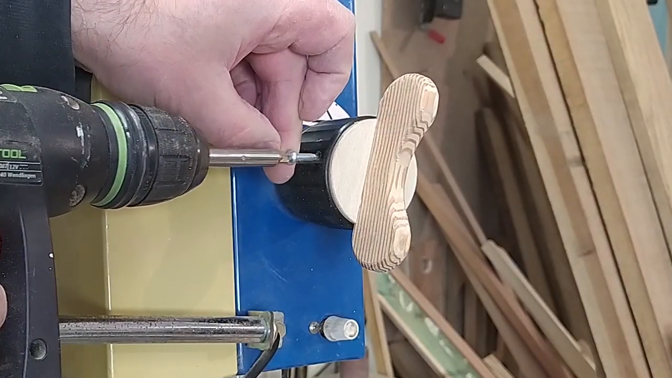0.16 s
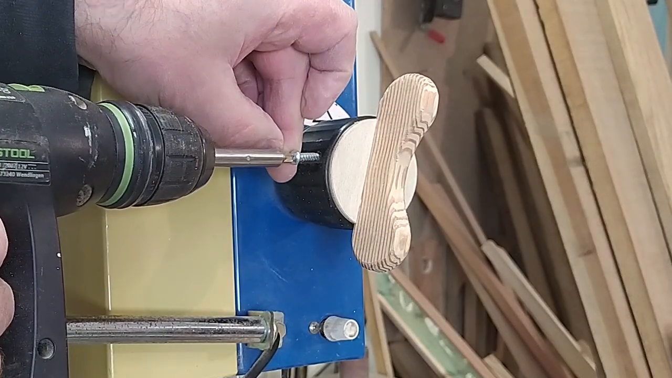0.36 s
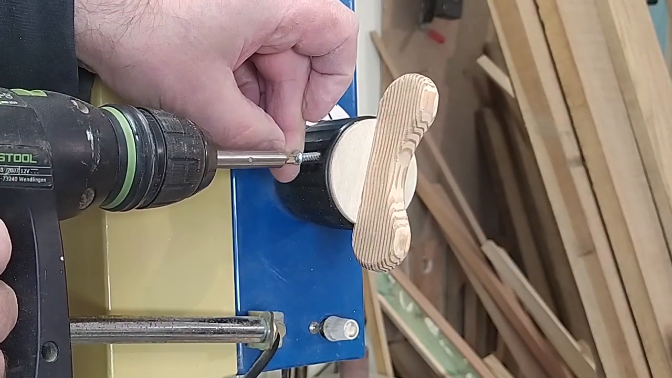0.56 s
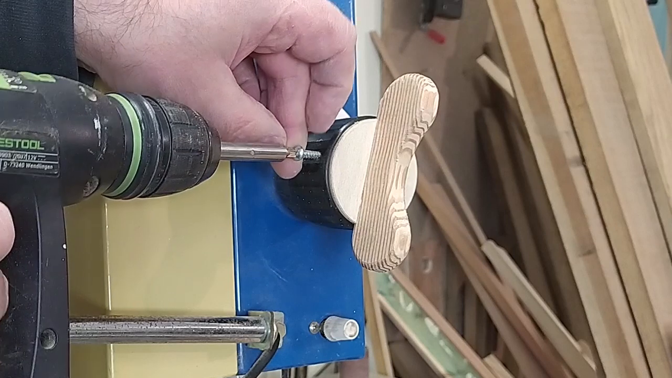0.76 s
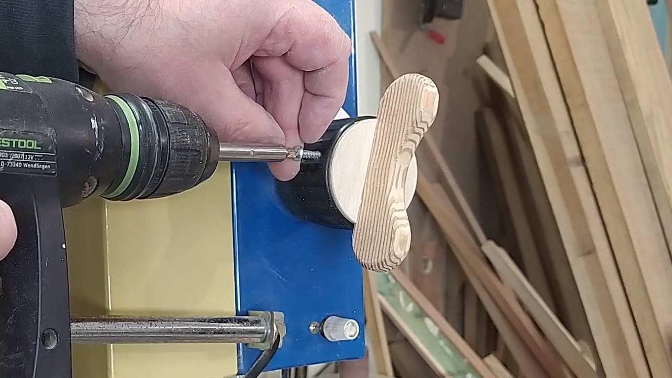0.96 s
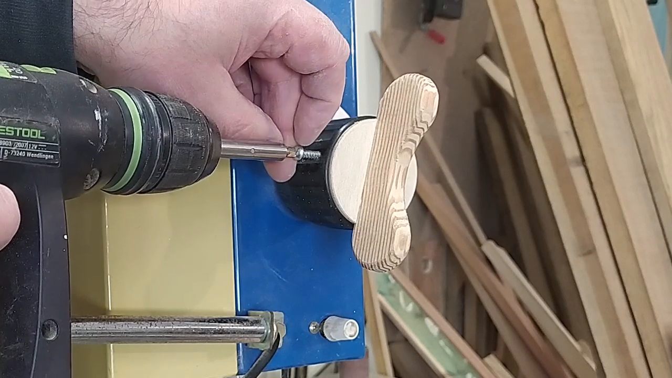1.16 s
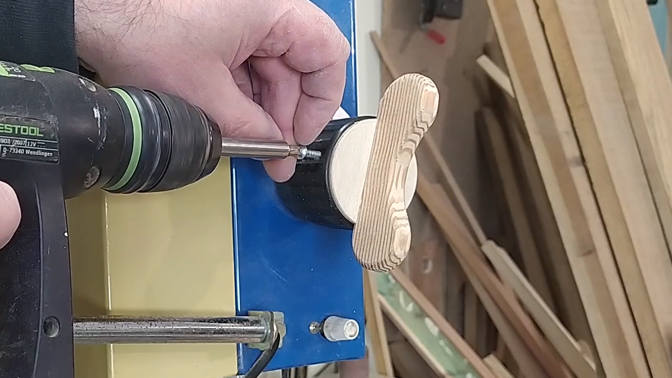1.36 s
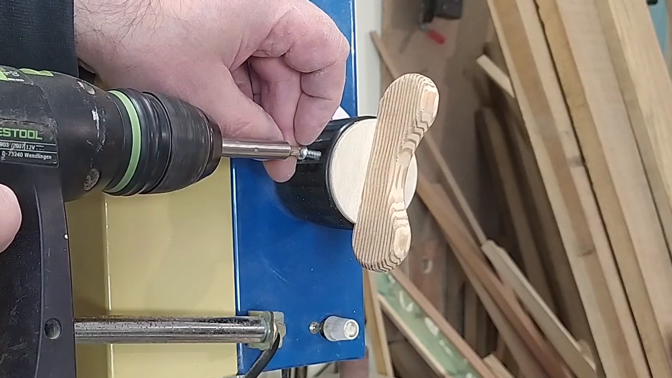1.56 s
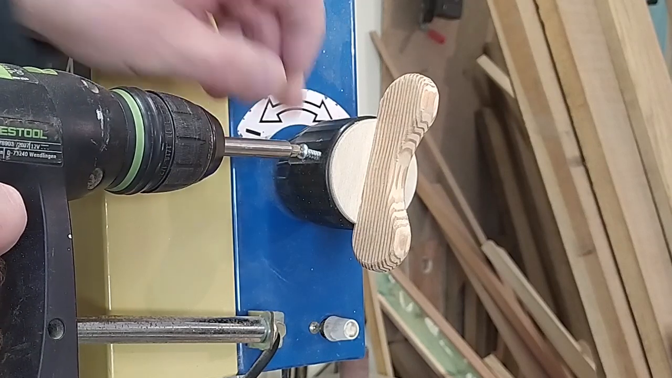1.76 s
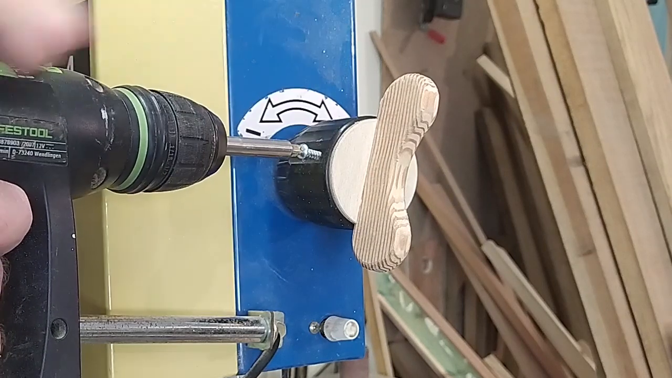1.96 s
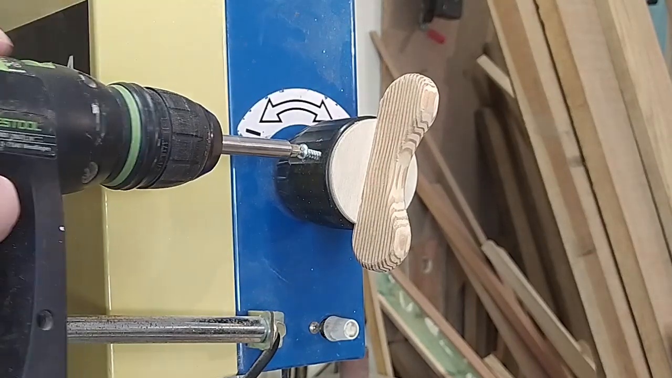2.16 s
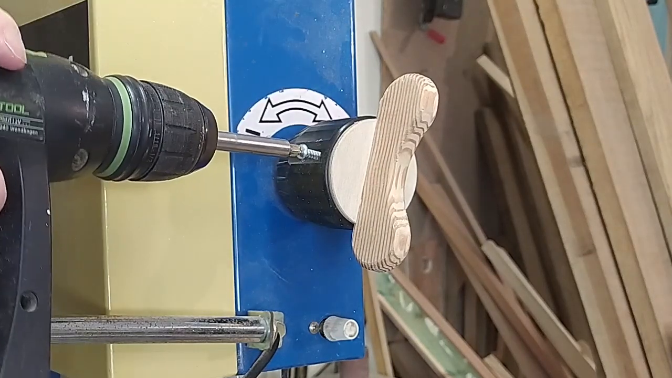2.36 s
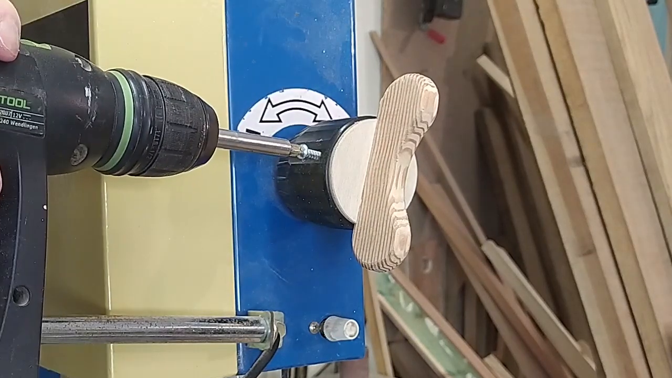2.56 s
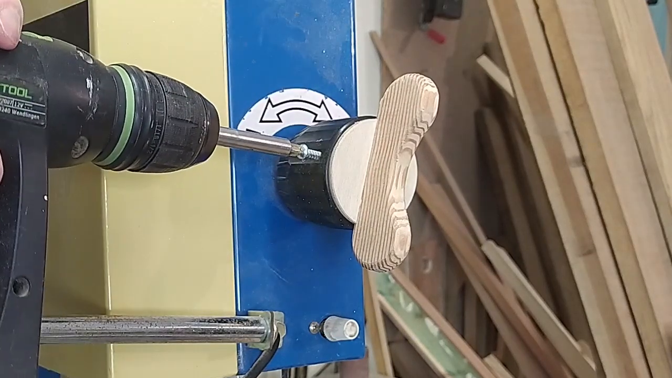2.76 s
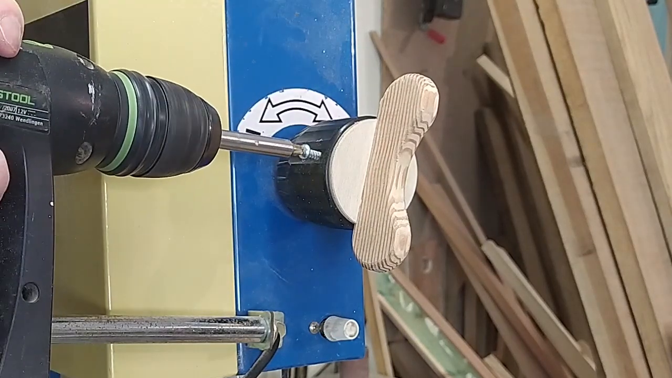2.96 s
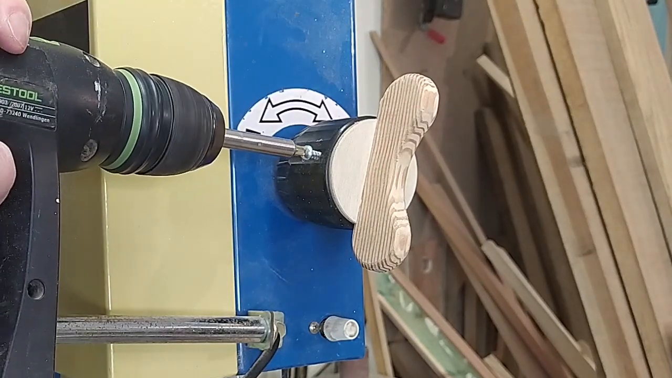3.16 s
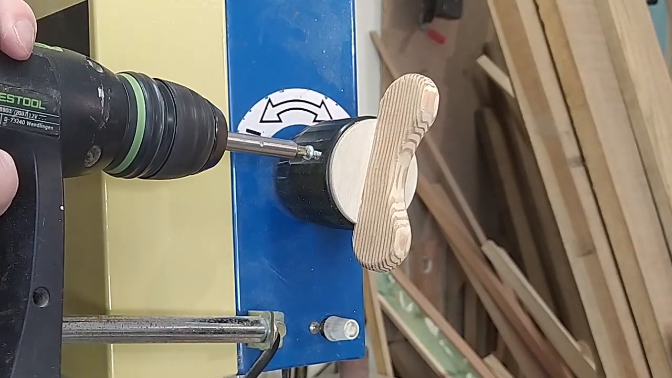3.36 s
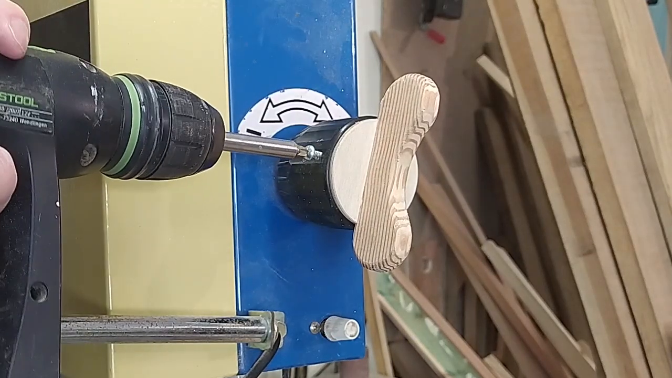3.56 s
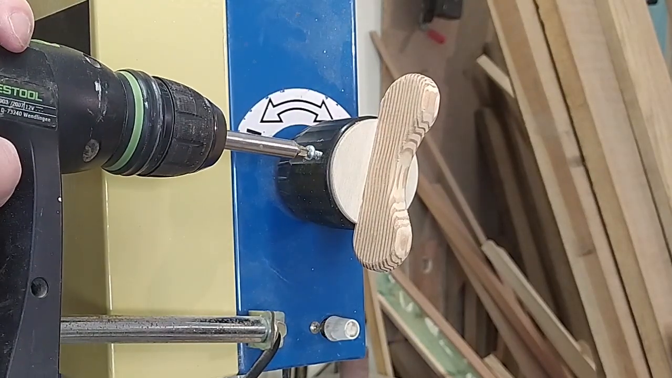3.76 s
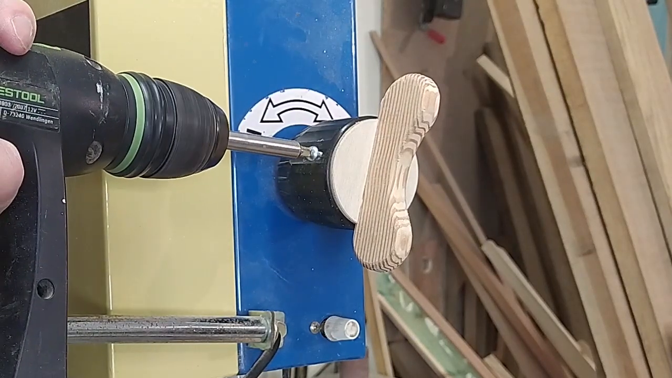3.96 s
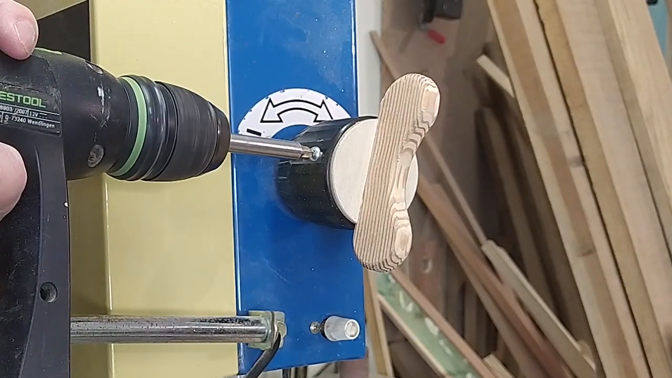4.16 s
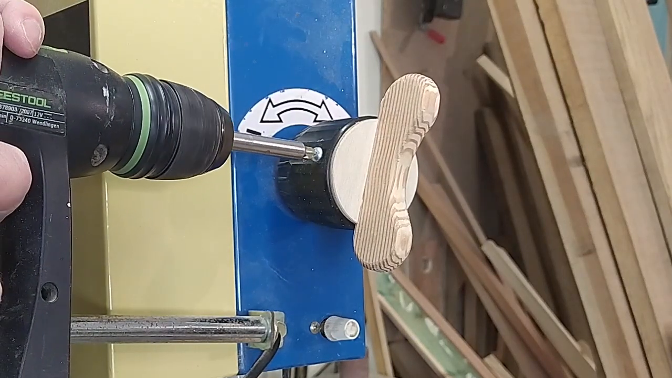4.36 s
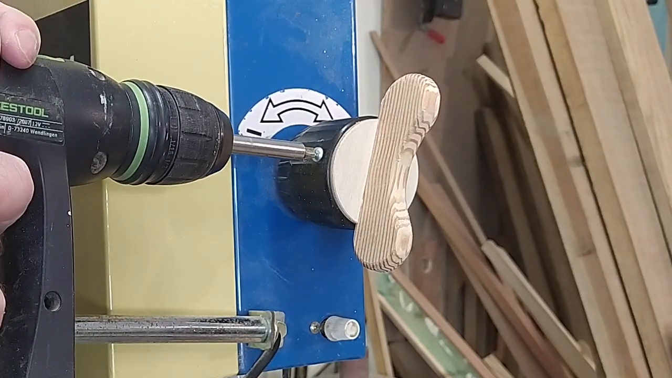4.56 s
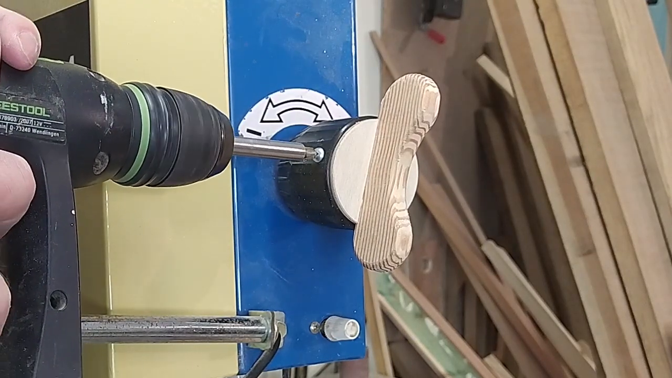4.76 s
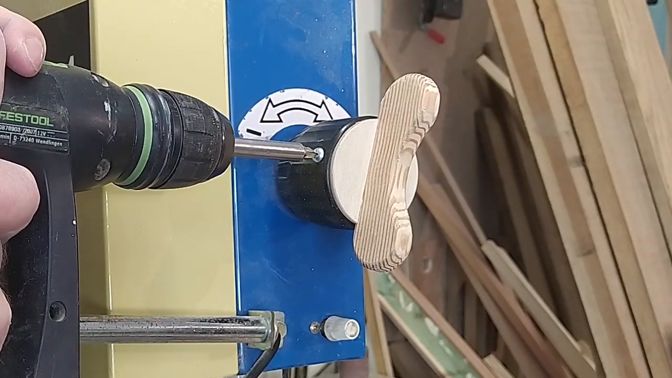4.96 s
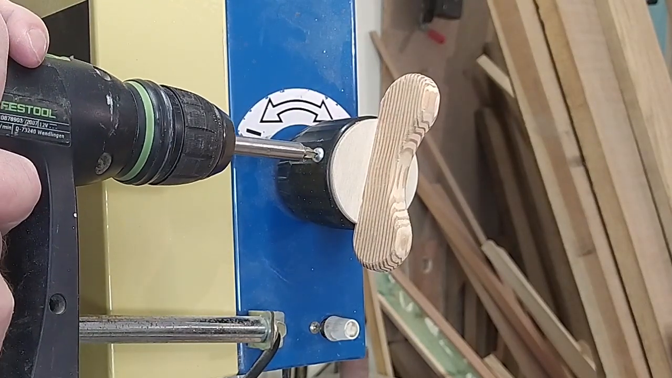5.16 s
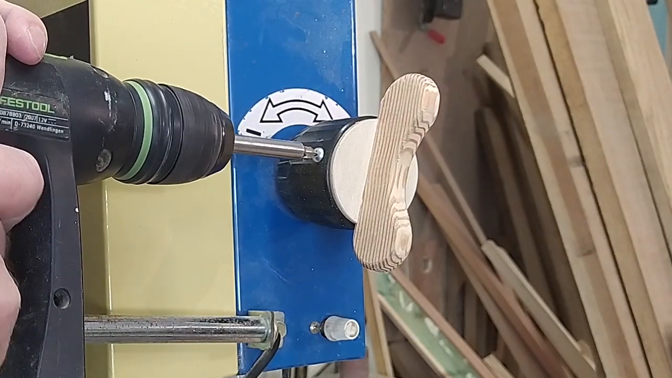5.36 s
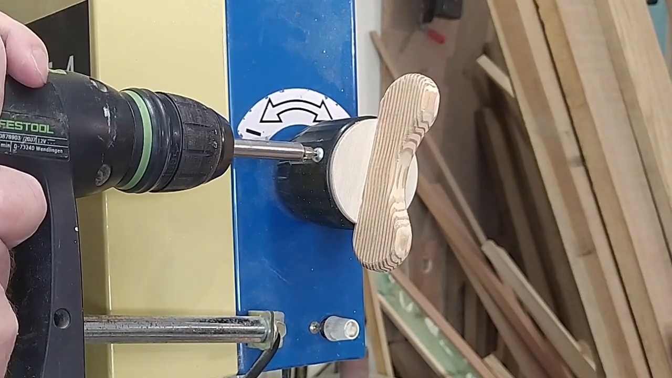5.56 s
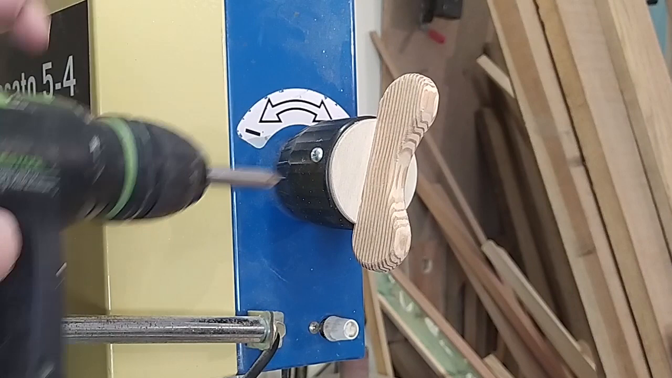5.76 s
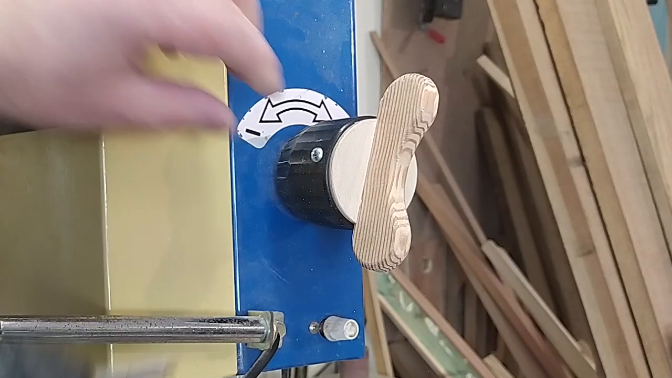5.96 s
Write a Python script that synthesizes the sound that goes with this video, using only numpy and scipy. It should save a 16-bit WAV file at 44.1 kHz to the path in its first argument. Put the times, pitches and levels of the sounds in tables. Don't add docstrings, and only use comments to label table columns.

```python
import sys
import numpy as np
from scipy import signal
from scipy.fft import rfft, irfft, next_fast_len
from scipy.io import wavfile
from scipy.ndimage import uniform_filter1d

SR = 44100
rng = np.random.default_rng(int(sys.argv[2]) if len(sys.argv) > 2 else 0)


def invert_db(level):
    return 10 ** (np.asarray(level, dtype=float) / 20)


def persist_wave(psi):
    counts = np.round(np.clip(psi, -1, 1) * 32767).astype(np.int16)
    wavfile.write(sys.argv[1], SR, np.atleast_2d(counts).T)


N = 265834
T = np.arange(N) / SR
SIZE = next_fast_len(N + SR)

# [f/Hz, level/dB per Hz]
SHOP_AIR = [(12, -37), (20, -3), (60, -6), (81, -18.5), (189, -19.5), (263, -26), (302, -23.5), (1190, -32),
            (1650, -32), (3970, -44), (10600, -42), (14000, -74)]
SHOP_DB = -65.5

# [t/s of peak, level/dB, rise/s per 20 dB,
# fall/s per 20 dB, deep sway/dB re level]
LEANS = [(0.072, -63.5, -2.5, 0.1, 0), (0.285, -57.5, 0.05, 0.7, -9), (0.39, -53, 0.04, 0.11, 6.5),
         (0.64, -59, -0.1, 0.36, -2), (1.77, -66, 0.3, 0.45, 13), (1.9, -63, 0.6, 0.34, 16.5),
         (2.308, -72.5, -0.2, 0.2, -1), (2.63, -79, 0.3, .13, 9.5), (3.06, -67.5, .09, -6, 12),
         (3.475, -53, 0.7, .03, 4), (4.3, -52.5, .5, .5, 8.5), (5.08, -55, 3, 0.5, 10.5)]
# [t/s, push level/dB, clatter/dB re push]
JOLTS = [(0.278, -62, -1.5), (0.356, -43, 2), (0.636, -61, -15), (3.544, -20, 3), (3.589, -37, 6),
         (3.614, -30.5, -1), (4.566, -17, 4), (4.585, -34.5, 10), (4.606, -29, -6), (4.639, -27.5, -6),
         (5.07, -37.5, -15), (5.511, -16, 2), (5.529, -35, 2.5), (5.572, -31, 11), (5.6, -35, 6)]
# [f/Hz, level/dB, t60/s]
PANELS = [(62, -14, 0.3), (83.2, -9.5, 0.44), (103.7, -15.5, 0.89), (113.9, -17, 1.6), (161.97, -12, 2.5),
          (182, -11.5, 1.78), (198, -2, 0.21), (268.4, -1.5, 0.5), (295, -16.5, 2.6), (289.5, -7.5, 0.91),
          (363.3, -6.5, 0.92), (388, -4.5, 0.48), (414.8, -6.5, 0.56), (483.6, -13.5, 0.85),
          (559.4, -13, 0.86), (688, -16, .3), (717, -1, 0.26), (777, -6, 0.14), (1100, -30, .3),
          (1550, -16, .12), (1670, -26, .12)]
# [f/Hz, level/dB per Hz]
CLATTER = [(60, -53), (120, -21), (180, -2), (270, 3), (450, -12), (890, -15.5), (1450, -18.5),
           (2430, -23.5), (6300, -38), (8500, -29), (10500, -33.5), (15600, -66)]
CLATTER_T60_S, CLATTER_S_PER_DB = 0.25, 0.06

# [t/s, peak
# level/dB]
SCREW_TICKS = (-14, -10, 2, -25), [(0.1521, -64), (0.187, -63), (0.2853, -62), (1.4087, -49), (2.2039, -60),
               (2.2692, -57), (2.3094, -58)]
CHUCK_TICKS = (2.5, -8, 1.05, -31), [(0.3506, -59.5), (1.3164, -51), (1.3778, -56.5), (2.6094, -58.5),
               (2.9934, -56.5), (5.343, -46.5), (5.9189, -49)]
SQUEEZE_TICKS = (-13.5, -6.5, 0.76, -22.5), [(1.2595, -51), (2.8993, -33.5), (3.014, -39), (3.8901, -51),
                 (4.8302, -27.5)]
TRIGGER_TICKS = (-14.5, -6.5, 0.97, -48), [(1.317, -40), (3.9434, -32), (3.9644, -45), (4.8466, -41),
                 (5.2644, -40.5), (5.3323, -36.5), (5.447, -32), (5.4725, -31)]
BIT_TICKS = (-5.5, -11, 0.75, -14), [(1.4795, -28), (3.5498, -19.5), (3.644, -27), (4.5694, -18.5),
             (5.0894, -32), (5.5018, -23.5), (5.5144, -22)]
# [f/Hz, level/dB]
SNAP = [(1500, -13), (3000, -8), (4500, -11), (6000, -1.5), (8600, 0.5), (10500, -4), (12500, -30),
        (15000, -36)]

# [t/s, commutation rate f/Hz (six to a shaft turn), gear effort level/dB]
RUNS = [
    [(1.4, 60.24, -72.5), (1.45, 430.6, -53.5), (1.53, 452, -52.5), (1.575, 640, -48.5), (1.65, 670, -49.5),
     (1.7, 488.8, -53.5), (1.88, 451.4, -49), (2.04, 80, -79.5)],
    [(3.04, 60.64, -68.5), (3.095, 540.3, -46.5), (3.19, 940.5, -44.5), (3.36, 944.5, -42),
     (3.46, 885.3, -42.5), (3.54, 939.6, -44.5), (3.635, 550, -40.5), (3.69, 422, -76)],
    [(4.005, 61, -72.5), (4.05, 701, -42.5), (4.1, 1015, -40.5), (4.15, 1030, -40), (4.31, 965.4, -41),
     (4.51, 961, -41), (4.555, 1033, -42.5), (4.69, 400.3, -56.5)],
    [(4.865, 61, -75), (4.915, 598, -42), (4.96, 845, -40), (5.03, 921.8, -43.5), (5.085, 699, -49),
     (5.12, 480, -75)],
    [(5.457, 60, -61), (5.515, 599.7, -40), (5.63, 920, -50.5)],
]
# [chopping starts t/s, brake t/s, whine level/dB, chopping depth/dB, gear tones/dB re rasp]
PULLS = [
    (1.403, 1.944, -58.5, 13, -3),
    (3.062, 3.656, -43.5, -3, -2.5),
    (4.016, 4.646, -45.5, 0, -1.5),
    (4.871, 5.075, -45, -0.5, 1),
    (5.465, 5.599, -42, 4, -4),
]
# [multiple of commutation rate, level/dB re whine]
SIDEBANDS = [(-3, -46), (-2, -28), (-1, -7), (1, -4.5), (2, -15.5), (3, -25.5), (4, -16.5)]
# [multiple of commutation rate, level/dB re rasp]
GEAR_TONES = [(1.6, -6.5), (1.799, -24), (3, -21), (3.262, 0.5), (4.828, -8.5)]
# [f/Hz, level/dB per Hz]
HOUSING = [(130, -16.5), (300, -11), (750, -3.5), (1150, -6), (1600, -1), (1880, -6), (2210, 2.5),
           (2800, -6.5), (4600, -6.5), (5800, -13), (8800, -3), (10000, -11), (10800, -29), (13000, -23),
           (14600, -43)]
# [f/Hz, level/dB]
SING = [(500, -17), (720, -1.5), (1100, 8), (1550, -4), (2200, 2), (3000, -7), (3900, -42), (4400, 2.5),
        (5000, 7.5), (7000, -27), (9000, -3), (9900, -9.5), (10600, -45)]
CHOP_HZ, FULL_SPEED_HZ = 7967.5, 950
WHINE_RISE_S, WHINE_START_DB = 0.05, -8
GROWL_DB, GROWL_DB_PER_OCTAVE = -0.5, -1
SIZZLE_DB, SIZZLE_PER_DEPTH = -1.93, 0.41
WORN_SHARE = 0.43
WORN_TURNS, WORN_SPOTS = 4, 500

# [t/s of peak, level/dB, rise/s per 20 dB, fall/s per 20 dB]
GRIP_RUBS = [(2.207, -79, -1.5, 0.5), (2.27, -75.5, -0.4, -1), (2.33, -79, 1, -1),
             (2.42, -60.5, 0.11, 0.07), (2.475, -61.5, 0.29, -0.05), (2.575, -67, 0.3, -0.06),
             (2.69, -83, 3.5, .05), (5.92, -61, 0.13, 6), (5.94, -80, -1.5, -8)]
# [f/Hz, level/dB per Hz]
RUB = [(710, -51), (1200, -22), (1770, -18), (2210, -9.5), (3780, -15), (5570, -13.5), (8930, -3),
       (15600, -28)]

# [f/Hz, left minus right/dB]
PORTS_TOOL = [(60, 5), (150, 6.5), (400, 1.5), (800, 2.5), (1200, 7.5), (1600, -6.5), (2250, 9.5),
              (3000, -4.5), (4400, -7), (6000, -14.5), (7200, 0), (9000, -13), (12000, -11.5)]
# [f/Hz, left minus right/dB]
PORTS_FAR = [(60, -2), (110, 8.5), (200, 4.5), (380, 5.5), (700, 2.5), (1290, 4), (2380, -4), (4400, 4.5),
             (8120, -3), (15000, 4)]
# [f/Hz, t60/s]
ROOM_T60 = [(100, 0.95), (250, 0.48), (600, 0.82), (1500, 0.46), (3500, 0.51), (8000, 0.4), (14000, 0.18)]


def unit(x):
    return x / np.sqrt(np.mean(x ** 2))


def read_curve(points, hz):
    f, value = np.transpose(points)
    return np.interp(np.log(np.maximum(hz, 1)), np.log(f), value)


def colour(x, points):
    log_gain = read_curve(points, np.arange(2049) * SR / 4096) * np.log(10) / 20
    cepstrum = irfft(log_gain)
    cepstrum[1:2048] *= 2
    cepstrum[2049:] = 0
    response = irfft(np.exp(rfft(cepstrum)))
    return signal.fftconvolve(x, response)[:len(x)]


def band(x, lo_hz, hi_hz):
    return signal.sosfilt(signal.butter(2, [lo_hz, hi_hz], "band", fs=SR, output="sos"), x)


def decay(t, t60):
    return np.exp(-np.log(1000) * t / t60)


def walk(rate):
    hold = int(SR / rate)
    steps = np.repeat(rng.standard_normal(N // hold + 1), hold)
    return 1.47 * uniform_filter1d(uniform_filter1d(steps, hold), hold)[:N]


def swells(rows, extra_db=0):
    s, db, rise, fall = np.array(rows)[:, :4].T[:, :, None]
    t = T[::32]
    drop = np.where(t < s, (s - t) / np.abs(rise), (t - s) / np.abs(fall))
    each = invert_db(db + extra_db - 20 * drop)
    return np.interp(T, t, np.sqrt(np.sum(each ** 2, axis=0)))


def shop():
    mid, left, right = (colour(rng.standard_normal(N), SHOP_AIR) for _ in range(3))
    lowpass = signal.butter(2, 130, fs=SR, output="sos")
    deep = signal.sosfilt(lowpass, [mid, left, right])
    air = np.array([left - deep[1], right - deep[2]])
    air = air + deep[0] * invert_db(2.0 * walk(2.8))
    return unit(air) * invert_db(SHOP_DB + np.array([[2.0], [-2.0]]))


def ring(x, modes, build=1.2):
    t, response = T[:2 * SR], 0
    for k, (hz, db, t60) in enumerate(modes):
        build_up = 1 - np.exp(-t * hz / build)
        tone = np.sin(2 * np.pi * hz * t)
        response = response + (-1) ** k * invert_db(db) * build_up * decay(t, t60) * tone
    return signal.fftconvolve(x, response)[:N]


def cabinet():
    push, rattle = np.zeros(N), np.zeros(N)
    for s, db, clatter_db in JOLTS:
        t60 = max(CLATTER_T60_S + CLATTER_S_PER_DB * (db + 18.5), .02)
        after = np.maximum(T - s + 0.00523, 0)
        push += invert_db(db) * after / 0.00031 * np.exp(-after / 0.00024)
        rattle += invert_db(db + clatter_db) * np.minimum(after / 0.0044, 1) * decay(after, t60)
    lean = swells(LEANS)
    sway = swells(LEANS, np.array(LEANS)[:, -1:])
    stir = lean * band(rng.standard_normal(N), 150, 460)
    hum = sway * band(rng.standard_normal(N), 143.5, 172)
    late_push = np.roll(push, 130)
    panels = ring(invert_db(-31) * late_push + invert_db(-37.0) * stir, PANELS)
    parts = unit(colour(rng.standard_normal(N), CLATTER))
    loose = invert_db(-5.5) * rattle * parts + invert_db(-4.5) * lean * band(parts, 190, 680)
    return band(panels + loose + invert_db(13.5) * hum, 55, 18000)


def ticks():
    lead = 480
    out = np.zeros((2, N + SR))
    t = T[:2500] - lead / SR
    after = np.maximum(t, 0)
    for kind, events in (TRIGGER_TICKS, SQUEEZE_TICKS, BIT_TICKS, SCREW_TICKS, CHUCK_TICKS):
        body_db, pan_db, ring_ms, lead_db = kind
        for s, db in events:
            noise = rng.standard_normal((2, len(t)))
            ring_and_fizz = np.exp(-1000 * after / ring_ms) + invert_db(-11) * np.exp(-after / 0.0038)
            fade = np.where(t < 0, invert_db(lead_db), ring_and_fizz)
            top = colour(noise[0] * fade, SNAP)
            body = band(noise[1] * (t >= 0) * np.exp(-220 * after / ring_ms), 380, 2650)
            snap = top / np.abs(top).max() + invert_db(body_db) * body / np.abs(body).max()
            snap = invert_db(db + 6.5) * snap
            for side, lag in enumerate((10, 0)):
                at = int(s * SR) + lag - lead
                out[side, at:at + len(t)] += snap * invert_db((1.0 - side) * pan_db)
    return out[:, :N]


def waver(slow, quick):
    return 2.5 * walk(slow) + 2.5 * walk(quick)


def joined(tables, column, rest=-120):
    points = []
    for table in tables:
        points.append((table[0][0] - .01, rest))
        points += [(row[0], row[column]) for row in table]
        points.append((table[-1][0] + 0.014, rest))
    return np.interp(T, *np.transpose(points))


def held(column):
    rows = np.array(PULLS)
    pull = np.maximum(np.searchsorted(rows[:, 0] - .03, T) - 1, 0)
    return rows[pull, column]


def worn(turns):
    spots = rng.standard_normal((int(turns[-1] / WORN_TURNS) + 3, WORN_SPOTS))
    row = (turns / WORN_TURNS).astype(int)
    spot = (turns % 1 * WORN_SPOTS).astype(int)
    blend = turns / WORN_TURNS % 1 * np.pi / 2
    return np.cos(blend) * spots[row, spot] + np.sin(blend) * spots[row + 1, spot]


def gear_rasp(turn, hz, depth_db):
    grains = rng.standard_normal(N) * invert_db(1.0 * rng.exponential(size=N))
    spots = worn(turn / (12 * np.pi))
    teeth = np.sqrt(1 - WORN_SHARE) * unit(grains) + np.sqrt(WORN_SHARE) * spots
    run_out = 1 + 0.13 * np.cos(turn / 6)
    rasp = colour(teeth * run_out * invert_db(0.4 * walk(30)), HOUSING)
    rasp = rasp / np.std(band(rasp, 2500, 6500))
    growl = invert_db(GROWL_DB + GROWL_DB_PER_OCTAVE * np.log2(hz / FULL_SPEED_HZ))
    sizzle = invert_db(SIZZLE_DB + SIZZLE_PER_DEPTH * depth_db)
    return rasp + (growl - 1) * band(rasp, 100, 2700) + (sizzle - 1) * band(rasp, 6000, 10700)


def gear_song(turn, hz):
    song = 0
    for k, db in GEAR_TONES:
        song = song + invert_db(db + read_curve(SING, k * hz) + waver(14, 120)) * np.sin(k * turn)
    return song


def motor_whine(turn, hz, depth_db, steady):
    chop = 2 * np.pi * CHOP_HZ * T
    sides = 0
    for k, db in SIDEBANDS:
        level = invert_db(db + read_curve(SING, CHOP_HZ + k * hz) + waver(16, 60))
        sides = sides + level * np.sin(chop + k * turn)
    octave = invert_db(-33 + waver(20, 200)) * np.sin(2 * chop - turn) * (hz < 700) * (hz > 250)
    whine = invert_db(walk(25)) * np.sin(chop) + invert_db(depth_db) * (np.sqrt(steady) * sides + octave)
    pulls = [[(on, db + WHINE_START_DB), (on + WHINE_RISE_S, db), (off, db)] for on, off, db, _, _ in PULLS]
    return invert_db(joined(pulls, 1) + 8.5) * whine


def drill():
    hz = np.interp(T, *np.concatenate(RUNS).T[:2])
    turn = 2 * np.pi * np.cumsum(hz * (1 + 0.00375 * walk(40))) / SR
    depth_db = held(column=3)
    hz_per_s = np.gradient(uniform_filter1d(hz, 1500)) * SR
    steady = 1 / (1 + (hz_per_s / 2500) ** 2)
    song = invert_db(held(column=4)) * steady * gear_song(turn, hz)
    gears = invert_db(joined(RUNS, 2)) * (gear_rasp(turn, hz, depth_db) + song)
    return gears, motor_whine(turn, hz, depth_db, steady)


def grip():
    grains = rng.standard_normal(N) * invert_db(2.8 * rng.exponential(size=N) + 2.9 * walk(55))
    return unit(colour(grains, RUB)) * swells(GRIP_RUBS, 0.75)


def ports(x, lag, shade):
    hz = np.arange(SIZE // 2 + 1) * SR / SIZE
    tilt = invert_db(read_curve(shade, hz) / 2)
    spectrum = rfft(x, SIZE)
    delay = np.exp(-2j * np.pi * hz * lag / SR)
    left = irfft(spectrum * tilt * delay, SIZE)
    right = irfft(spectrum / tilt, SIZE)
    return np.array([left, right])[:, :N]


def room(x):
    t, tail = T[:SR], 0
    for hz in 80 * 2 ** np.arange(0, 7.6, .5):
        mid, side = (band(rng.standard_normal(SR), hz / 2 ** .25, hz * 2 ** .25) for _ in range(2))
        both = mid + min(hz / 1180.0, 1) * side * np.array([[1], [-1]])
        shade = invert_db(np.array([[.5], [-.5]]) * read_curve(PORTS_FAR, hz))
        tail = tail + both * shade * decay(t, read_curve(ROOM_T60, hz))
    tail = tail * np.minimum(t / 0.0043, 1)
    tail = tail / np.sqrt(np.sum(tail ** 2) / 2)
    return signal.fftconvolve(x[None], tail, axes=1)[:, :N]


def scene():
    air, boom, snaps = shop(), cabinet(), ticks()
    gears, whine = drill()
    tool = gears + grip()
    into_room = invert_db(-6.5) * tool + invert_db(-31) * whine + invert_db(-5.0) * boom + invert_db(-9.5) * snaps.mean(axis=0)
    direct = ports(tool, 11.59, PORTS_TOOL) + ports(whine, 8.73, PORTS_TOOL) + ports(boom, 6.24, PORTS_FAR)
    return direct + snaps + room(into_room) + air


def top_cut(x):
    return signal.sosfilt(signal.butter(12, 15760, fs=SR, output="sos"), x)


def record(dry):
    return top_cut(dry)


dry = scene()
out = record(dry)
persist_wave(out)
```